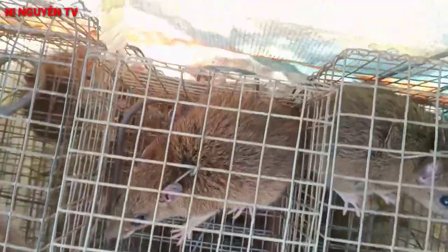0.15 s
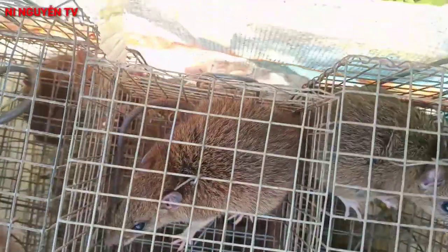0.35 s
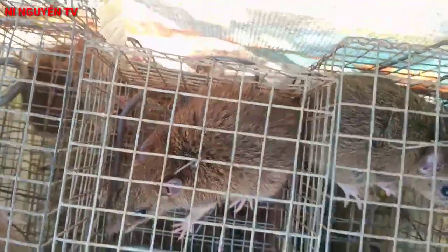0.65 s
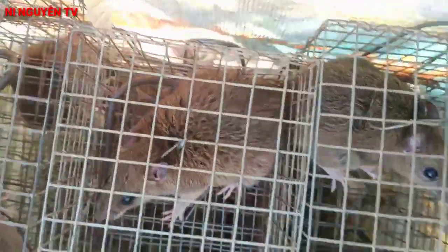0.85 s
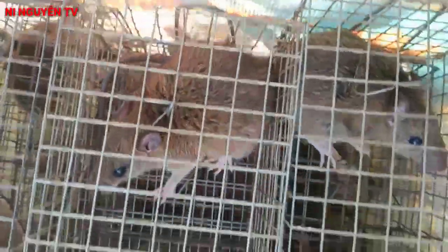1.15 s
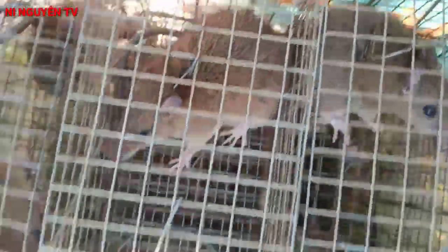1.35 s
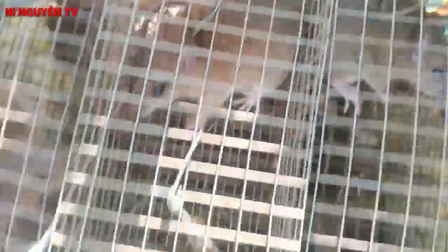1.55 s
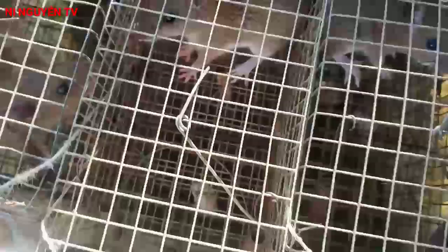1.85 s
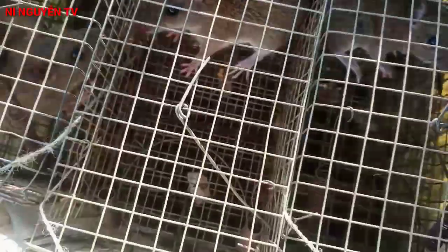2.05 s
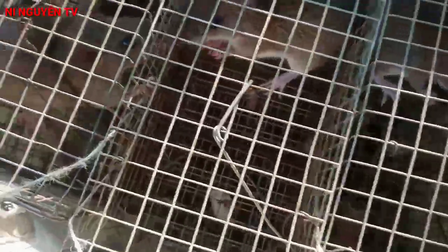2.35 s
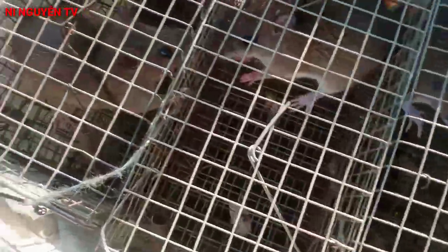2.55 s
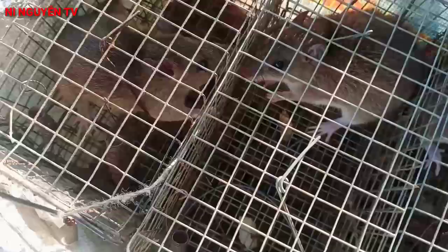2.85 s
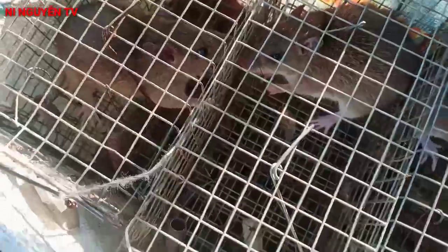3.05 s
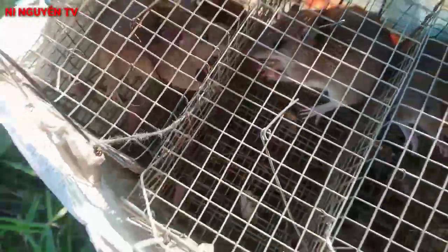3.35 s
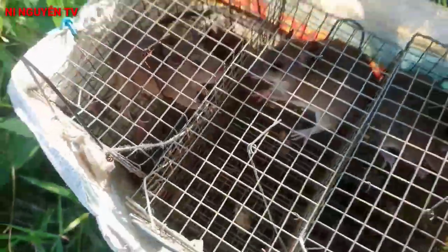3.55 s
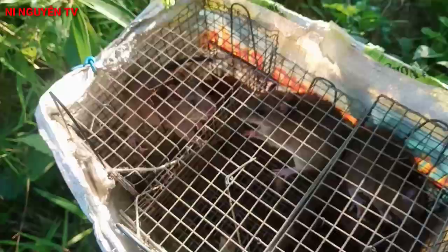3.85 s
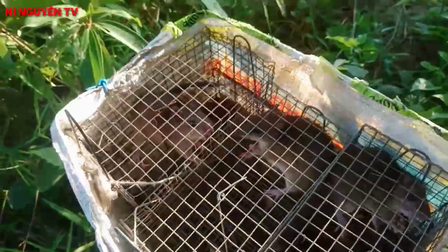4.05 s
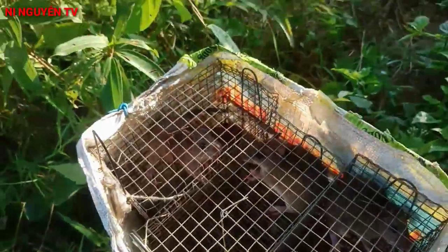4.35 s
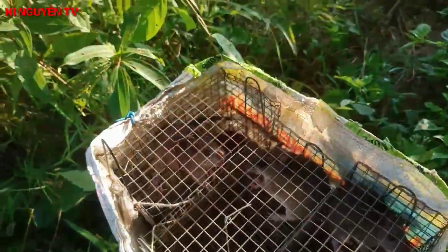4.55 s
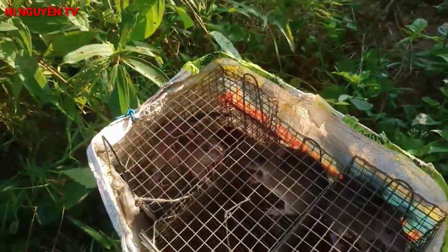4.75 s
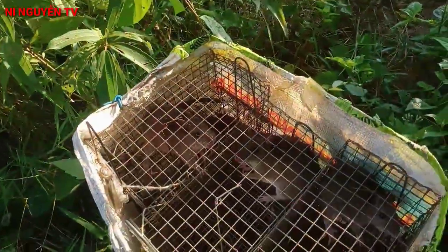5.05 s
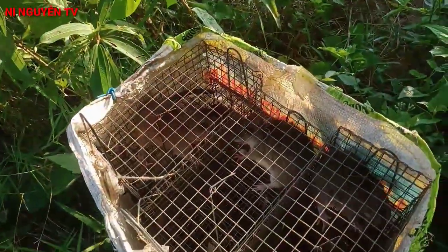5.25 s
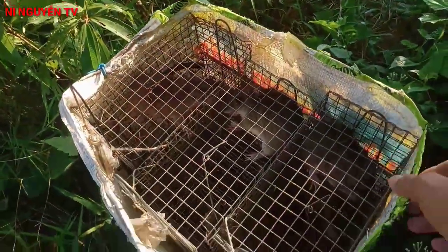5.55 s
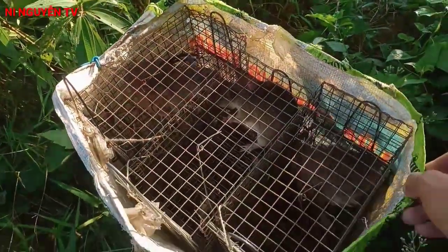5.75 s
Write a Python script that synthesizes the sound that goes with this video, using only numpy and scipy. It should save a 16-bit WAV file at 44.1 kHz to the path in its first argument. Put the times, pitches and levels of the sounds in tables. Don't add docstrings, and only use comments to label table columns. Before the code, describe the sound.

Outdoors among weeds, crickets, cicadas and a katydid drone over a low distant engine hum. Claws tick on cage wire and small birds whistle briefly. Just before two seconds a close rat begins hoarse, fluttering squeals while a dog barks far away. A second rat then screams louder and rougher, overloading the microphone, with sharp wire snaps between calls.

```python
import sys
import numpy as np
from scipy import signal
from scipy.fft import rfft, irfft
from scipy.io import wavfile
from scipy.ndimage import uniform_filter1d

SR = 44100
rng = np.random.default_rng(int(sys.argv[2]) if len(sys.argv) > 2 else 0)


def wrap_up_sound(samples):
    columns = np.atleast_2d(samples).T
    tamed = np.clip(columns, -1, 1)
    steps = np.round(tamed * 32767).astype(np.int16)
    wavfile.write(sys.argv[1], SR, steps)


def amplitude_ratio(level_db):
    exponent = np.asarray(level_db, float) / 20
    return 10 ** exponent


N = 259786
T = np.arange(N) / SR
SECOND_RAT_S = 3.72
CUTOFF_HZ = 15650


def rms_one(x):
    return x / np.sqrt(np.mean(x ** 2) + 1e-20)


def in_time(rows):
    s, *columns = np.transpose(rows)
    return [np.interp(T, s, c) for c in columns]


def at_hz(points, hz):
    f, db = np.transpose(points)
    return np.interp(np.log(np.maximum(hz, 1)), np.log(f), db, left=db[0] - 12, right=db[-1] - 21)


def drift(rate_hz):
    r = np.exp(-2 * np.pi * rate_hz / SR)
    white = rng.standard_normal(N + 20000)
    return rms_one(signal.lfilter([1], [1, -2 * r, r * r], white)[20000:])


def resonance(x, hz, width_hz):
    r = np.exp(-np.pi * width_hz / SR)
    poles = [1, -2 * r * np.cos(2 * np.pi * hz / SR), r * r]
    return signal.lfilter([(1 - r * r) / 2, 0, (r * r - 1) / 2], poles, x)


def coloured(x, spectrum):
    gain = amplitude_ratio(at_hz(spectrum, np.fft.rfftfreq(N, 1 / SR)))
    return rms_one(irfft(rfft(x) * gain, N))


def rats():
    # (time [s], level [dB], pitch [Hz])
    calls = [
        [(1.838, -22, 1215), (1.855, -20, 1210), (1.914, -22.5, 1195), (2.016, -13.5, 1159), (2.11, -11, 1091),
         (2.254, -8.5, 1190)],
        [(2.512, -14, 1096), (2.56, -13, 1192), (2.66, -11, 1193), (2.8, -10, 1250), (2.98, -9.5, 1265)],
        [(3.222, -13.5, 1173), (3.29, -11, 1133), (3.41, -8.5, 1211), (3.6, -11.5, 1273)],
        [(3.813, -10, 1059), (3.85, -4, 1091), (3.95, -4, 1208), (4.22, -6, 1210), (4.3, -11, 1180),
         (4.338, -13.5, 1240)],
        [(4.403, -24, 1225), (4.42, -18, 1220), (4.5, -16.5, 1214), (4.6, -19, 1263), (4.712, -22, 1293)],
        [(5.012, -11, 1295), (5.046, -4, 1301), (5.29, -3, 1308)],
        [(5.316, -19, 1215), (5.42, -13, 1188), (5.458, -13, 1232)],
        [(5.461, -10, 1231), (5.475, -5.5, 1250), (5.7, -4, 1218), (5.778, -7, 1264)],
        [(5.805, -17, 1160), (5.84, -17.5, 1215), (5.88, -22, 1260)],
    ]
    # (at start [Hz], at end [Hz])
    mouths = [(4340, 3800), (4288, 4130), (4500, 5300), (4480, 4610), (4900, 4500), (4360, 4620),
              (6000, 5650), (4500, 4640), (4620, 4900)]
    # (opening hoarse share [0-1], settled share [0-1], clearing time [s])
    hoarseness = [(.75, .2, .28), (.5, .06, .15), (.5, .07, .06), (.9, .55, .03), (.65, .06, .095),
                  (.85, .7, .2), (.45, .2, .12), (.78, .5, .3), (.4, .3, .06)]
    # (frequency [Hz], level [dB])
    clear_throat = [
        [(650, -7), (1100, -15), (1340, -12), (1810, 0.5), (2410, -16), (3010, -15.5), (3710, -4), (5230, -5),
         (5850, -4), (9310, -16), (15500, -19)],
        [(650, -24), (1100, -5.5), (1750, -14.5), (3550, -3), (4100, 2), (4530, -1), (8420, -14), (9730, -10),
         (11700, -22.5), (14300, -6), (15500, -25)],
    ]
    # (frequency [Hz], level [dB])
    hoarse_throat = [
        [(290, -57), (500, -9), (901, -23), (1150, 7.5), (1430, -21.5), (2290, 0), (2760, -15.5), (3580, 6.5),
         (3900, -6), (4700, 4), (8230, -5.5), (8970, -23.5), (15500, 1.5)],
        [(210, -64), (350, -37), (726, -9), (1050, -22), (1260, -8.5), (1600, -13.5), (3270, -10.5), (4490, 1),
         (5790, -9.5), (9620, -11.5), (10700, -22.5), (14500, -19.5), (15500, -7)],
    ]
    # (time [s], level [dB])
    croak_curve = [(1.82, -38), (1.828, -18.5), (1.844, -28), (1.94, -24.5), (1.948, -24.5), (2.0, -30)]
    stutter_start_s, stutter_end_s, stutter_hz = 3.822, 3.846, 175

    controls = np.array([squeal(*row) for row in zip(calls, mouths, hoarseness)])
    loudest = controls[:, 0].argmax(axis=0)
    level_db, pitch_hz, mouth_hz, rough, beats, depth, doubling = controls[loudest, :, np.arange(N)].T
    caught = (T > stutter_start_s) & (T < stutter_end_s)
    catches = np.cos(np.pi * stutter_hz * (T - stutter_start_s)) ** 2
    level = amplitude_ratio(level_db) * (1 - caught * .85 * catches)

    swing = np.cos(2 * np.pi * beats) - 0.31 * np.cos(4 * np.pi * beats + 0.44)
    wobble = (.004 + .03 * rough) * drift(70.0) + .02 * rough * drift(400.0) + .006 * drift(30)
    cycles = np.cumsum(pitch_hz * (1 + depth * swing + wobble)) / SR
    clear = throat(partials(cycles, pitch_hz, rough, doubling), clear_throat, mouth_hz, 0)
    clear = clear * amplitude_ratio(27.0 * depth * swing + 0.9 * drift(150.0))

    count = np.floor(cycles).astype(int)
    beat_db = rng.normal(0, 2.14, N)[count] + 2.5 * (count % 2)
    gate = .3 + (.5 + .5 * np.cos(2 * np.pi * cycles)) ** 2
    hoarse = throat(rng.standard_normal(N) * gate * amplitude_ratio(beat_db), hoarse_throat, mouth_hz, 1.0)
    hoarse = hoarse * amplitude_ratio(1.6 * drift(45.0) + 1.5 * drift(200.0) - .8)

    slide = beats % 1
    croak_phase = 2 * np.pi * np.cumsum(2000 - 500 * slide + 110 * drift(60)) / SR
    croak = np.sin(croak_phase) * np.sin(np.pi * slide) ** 1.5
    croak = croak * amplitude_ratio(in_time(croak_curve)[0] + 4.5 + 2.0 * drift(40.4))
    croak = croak * (T > croak_curve[0][0]) * (T < croak_curve[-1][0])
    return level * (np.sqrt(1 - rough) * clear + np.sqrt(rough) * hoarse) + croak


def squeal(curve, mouth, hoarseness):
    attack_db_per_s, release_db_per_s = (1500, 2200), (650, 800)
    flutter_depth = (0.064, 0.017)
    flick_s = .018

    level_db, pitch_hz = in_time(curve)
    start, end, second = curve[0][0], curve[-1][0], int(curve[0][0] > SECOND_RAT_S)
    since, after = T - start, np.maximum(T - end, 0)
    mouth_hz = np.interp(T, [start, end], mouth) + 47 * (level_db - level_db.max())
    sunk = amplitude_ratio(1.3 * (level_db - np.maximum.accumulate(level_db)))
    level_db = level_db + attack_db_per_s[second] * np.minimum(since, 0) - release_db_per_s[second] * after
    pitch_hz = pitch_hz * (1 + .11 * np.minimum(after / flick_s, 1))

    opening, settled, clearing = hoarseness
    strain = settled + (opening - settled) * np.exp(-(np.maximum(since, 0) / clearing) ** 2)
    strain = strain * sunk ** second
    strain = np.where(after > flick_s, .95, strain)
    beats = .05 + 71 * since - 26 / 2 * since ** 2
    calming = np.clip(1 - (end - T) / .12, 0, 1)
    depth = flutter_depth[second] * (1 - .45 * calming)
    doubling = second * np.minimum(1.3 * strain, .8)
    return level_db, pitch_hz, mouth_hz, strain, beats, depth, doubling


def partials(cycles, pitch_hz, rough, doubling):
    out, loose = np.zeros(N), [drift(300.0), drift(300.0), drift(300.0)]
    halves = doubling * amplitude_ratio(3 * drift(40.0))
    flicker = drift(35)
    for twice in range(1, 27):
        k = twice / 2
        slip = (.05 * k * rough + .14 * max(k - 5.5, 0)) * loose[twice % 3]
        strength = halves * min(k / 3.5, 1) ** 2 if twice % 2 else 1
        strength = strength * (k * pitch_hz < CUTOFF_HZ)
        strength = strength * amplitude_ratio((1.2 + 3.5 * rough) * np.roll(flicker, 7919 * twice))
        out += strength * np.cos(2 * np.pi * k * cycles + .9 * k * k + slip)
    return out


def throat(x, spectra, mouth_hz, stretch):
    mouth_db, mouth_width_hz, mouth_rest_hz = 5, 1300, 4500
    answer_start_s, answer_end_s = 5.31, 5.46
    f, t, z = signal.stft(x, SR, nperseg=256)
    centre_hz = np.interp(t, T, mouth_hz)
    mouth = mouth_db / (1 + ((f[:, None] - centre_hz) / mouth_width_hz * 2) ** 2)
    first = at_hz(spectra[0], f)[:, None]
    second = at_hz(spectra[1], f[:, None] * (mouth_rest_hz / centre_hz) ** stretch)
    first_calls = (t < SECOND_RAT_S) | (t > answer_start_s) & (t < answer_end_s)
    colour = np.where(first_calls, first, second)
    y = signal.istft(z * amplitude_ratio(colour + mouth), SR, nperseg=256)[1][:N]
    return y / np.sqrt(uniform_filter1d(y ** 2, size=2600) + 1e-12)


def wire():
    # (time [s], peak level [dB], ring [Hz], width [Hz])
    flicks = [
        (0.233, -18.5, 826, 700),
        (.2674, -12, 5200, 4000),
        (.5407, -17, 5430, 3000),
        (1.3453, -20, 2200, 2000),
        (1.4516, -26, 2800, 1500),
        (1.583, -28, 6000, 3000),
        (1.6015, -17.5, 4500, 5000),
        (1.722, -18, 4500, 4000),
        (4.369, -12, 4004, 1199),
        (4.575, -8, 5500, 4030),
    ]
    out = np.zeros(N)
    for (s, peak_db, hz, width_hz), noise in zip(flicks, rng.standard_normal((len(flicks), 900))):
        crack = resonance(noise * np.exp(-np.arange(900) / 160), hz, width_hz)
        out[round(s * SR):][:900] += amplitude_ratio(peak_db) * crack / np.abs(crack).max()
    return out


def dog():
    # (time [s], length [s], top pitch [Hz], level [dB], hoarseness [0-1])
    barks = [
        (1.989, 0.13, 474, -26.5, 0.7),
        (2.197, 0.12, 462, -26, 0.67),
        (2.618, 0.11, 400.6, -29.5, 0.67),
        (2.847, 0.11, 447, -29, 0.36),
        (4.361, 0.02, 363, -31.5, 0.32),
        (4.386, 0.15, 408.7, -32.5, 0.7),
        (4.625, 0.12, 421.4, -33, 0.6),
        (5.316, 0.13, 420, -30.5, 0.48),
        (5.804, 0.097, 452, -32.5, 0.6),
        (2.448, 0.033, 413, -44.5, 0.61),
    ]
    arch = [(0, .68), (.15, .8), (0.404, 0.94), (.65, .82), (0.997, 0.54)]
    # (frequency [Hz], width [Hz], level [dB])
    muzzle = [(413, 354, 4), (770, 530, 3.5), (1250, 780, -1.5), (2200, 350, -14)]
    source, (share, bend) = np.zeros(N), np.transpose(arch)
    jitter, uneven, noise, lumps = drift(90), drift(250), rng.standard_normal(N), drift(45)
    for s, length, top_hz, level_db, hoarse in barks:
        span = (T >= s) & (T < s + length)
        u = (T[span] - s) / length
        pitch_hz = top_hz * np.interp(u, share, bend) * (1 + (.04 + .06 * hoarse) * jitter[span])
        cycles = np.cumsum(pitch_hz) / SR
        pulses = -np.diff(np.floor(cycles), prepend=-1) * 9 * amplitude_ratio(2.5 * uneven[span])
        breath = (.15 + hoarse * .6) * (1 - .6 * u) * noise[span] * (cycles % 1 < .4)
        shape = np.minimum(u / .03, 1) * np.minimum((1 - u) / .35, 1) ** .6
        gain = amplitude_ratio(level_db + 4.5 * np.exp(-u / 0.1) + 2.0 * lumps[span])
        source[span] += gain * shape * (pulses + breath)
    voice = sum((-1) ** k * amplitude_ratio(db + 20.5) * resonance(source, hz, width_hz)
                for k, (hz, width_hz, db) in enumerate(muzzle))
    return signal.sosfilt(signal.butter(2, 260, "high", fs=SR, output="sos"), voice)


def note(s, length, from_hz, to_hz, level_db, breathy, wobble):
    span = np.flatnonzero((T >= s) & (T < s + length))
    u = (T[span] - s) / length
    phase = 2 * np.pi * np.cumsum(from_hz + (to_hz - from_hz) * u) / SR
    out = np.zeros(N)
    out[span] = amplitude_ratio(level_db + 4) * np.sin(np.pi * u) ** .7 * np.sin(phase + 1.8 * breathy * wobble[span])
    return out


def birds():
    # (time [s], level [dB])
    low_notes = [(.278, -29), (.368, -29), (1.315, -36), (1.359, -35), (1.405, -36)]
    rising_notes = [(.341, -31.5), (.38, -30.5), (1.368, -40), (1.42, -44)]
    falling_notes = [(3.102, -33), (3.142, -25), (3.178, -23.5), (3.63, -30.5), (3.664, -24),
                     (3.705, -24.5)]
    # (time [s], length [s], from [Hz], to [Hz], level [dB])
    peeps = [(.292, 0.03, 5000, 4820, -33), (0.318, 0.031, 3180, 4530, -28), (.47, .05, 3050, 3000, -43),
             (1.035, .04, 5950, 5900, -43), (1.603, .025, 6000, 6100, -38), (1.707, .1, 3070, 3050, -47),
             (3.078, .037, 3300, 3250, -38), (3.202, 0.02, 1810, 1740, -28),
             (3.64, 0.16, 1880, 1980, -40.5), (3.645, 0.16, 2920, 2814, -38.5),
             (4.924, 0.033, 3390, 3140, -35.5)]
    # (time [s], length [s], from [Hz], to [Hz], level [dB])
    whistles = [
        (.581, .24, 2880, 2700, -44.5),
        (.752, .037, 2830, 2480, -40),
    ]
    wobble = drift(480.0)
    # length [s], from [Hz], to [Hz], breathiness [0-1]
    kinds = [(low_notes, (0.029, 3760, 3830, 0.46)),
             (rising_notes, (.038, 4400, 5000, 0.61)),
             (falling_notes, (0.0272, 5280, 4420, 0.25))]
    direct = sum(note(s, *shape[:3], db, shape[3], wobble) for notes, shape in kinds for s, db in notes)
    direct += sum(note(*row, 0.48, wobble) for row in peeps)
    direct += sum(note(*row, .05, wobble) for row in whistles)
    return direct + .15 * np.roll(direct, 530)


def insects():
    # (time [s], level [dB])
    chirps = [(.002, -37), (.225, -38), (.455, -37), (0.681, -36), (.912, -40.5), (1.14, -38), (1.375, -51),
              (1.47, -51), (1.705, -46), (2.31, -58), (3.06, -37), (4.766, -40), (4.96, -36)]
    # (frequency [Hz], level [dB per Hz])
    katydid_spectrum = [(9000, -24), (10500, -17), (12500, -8), (14200, -2), (15300, 0), (16000, 0)]
    far_db, cicada_db, katydid_db = -43, -40, -37
    stroke_hz, crest_s = 18.27, .02

    wobble = drift(240.0)
    near = sum(note(s + 0.034 * k, 0.0242, 4950, 4620, db - 2.0 * (k == 0), 0.39, wobble)
               for s, db in chirps for k in range(3))
    far = rms_one(resonance(resonance(rng.standard_normal(N), 4800, 400), 4800, 420)) * amplitude_ratio(2.0 * drift(30.0))
    cicada = rms_one(resonance(resonance(rng.standard_normal(N), 7020, 350), 7400, 400))
    cicada = cicada * amplitude_ratio(1.0 * drift(25.0))
    throb = 2 * np.pi * stroke_hz * (T - crest_s) + .5 * drift(.8)
    strokes_db = 2.8 * np.cos(throb) - 1.3 * np.cos(2 * throb) + 1.0 * np.cos(4 * throb)
    strokes_db = strokes_db + 0.4 * drift(3.7) + 1.2 * drift(60.0)
    katydid = coloured(rng.standard_normal(N), katydid_spectrum) * amplitude_ratio(strokes_db)
    return near + amplitude_ratio(far_db) * far + amplitude_ratio(cicada_db) * cicada + amplitude_ratio(katydid_db) * katydid


def engine():
    # (time [s], second order [Hz], level [dB])
    running = [(0, 132.5, -28.5), (1.95, 132, -29), (2.13, 129.7, -35.5), (2.2, 130, -29),
               (2.9, 130.2, -28.5), (3.2, 132.7, -28.5), (4.7, 132.7, -32.5), (5.89, 132.5, -29.5)]
    # (multiple of firing rate, level [dB])
    orders = [(1, -5.5), (2, -1), (3, -17), (4, -22.5)]
    line_hz, level_db = in_time(running)
    turns = np.cumsum(line_hz / 2 * (1 + 0.003 * drift(3.2))) / SR
    return sum(amplitude_ratio(level_db + db + 5 + 0.45 * drift(11.0)) * np.sin(2 * np.pi * k * turns + k * k)
               for k, db in orders)


def air():
    # (frequency [Hz], level [dB per Hz])
    ambience = [(15, -42), (25, -12), (136, -5.5), (211, -14), (460, -22), (1060, -22.5), (1370, -26.5),
                (1870, -25), (4090, -28.5), (4900, -42), (5580, -35.5), (6530, -33), (7240, -22),
                (9640, -30), (12500, -46), (16200, -66), (22000, -120)]
    return amplitude_ratio(-32.5 + 0.49 * drift(38.0)) * coloured(rng.standard_normal(N), ambience)


def scene():
    voice = rats()
    voice = voice + .1 * np.roll(voice, 310) + .05 * np.roll(voice, 900)
    mono = voice + wire() + dog() + birds() + insects() + engine() + air()
    return np.array([mono, mono])


def roll_off(x):
    return signal.sosfilt(signal.butter(12, 15630, fs=SR, output="sos"), x)


def record(dry):
    thin = signal.sosfilt(signal.butter(2, 45, "high", fs=SR, output="sos"), dry)
    limited = thin / (1 + np.abs(thin / 1.02) ** 4) ** .25
    cut = signal.sosfilt(signal.ellip(12, .5, 60, CUTOFF_HZ - 50, fs=SR, output="sos"), limited)
    return roll_off(cut)


dry = scene()
out = record(dry)
wrap_up_sound(out)
```